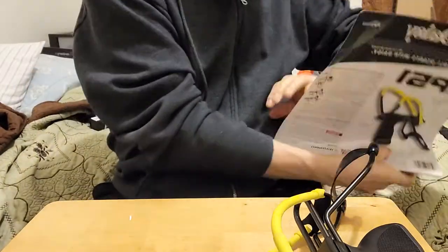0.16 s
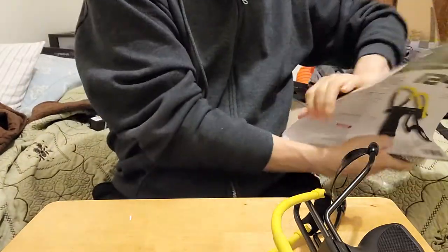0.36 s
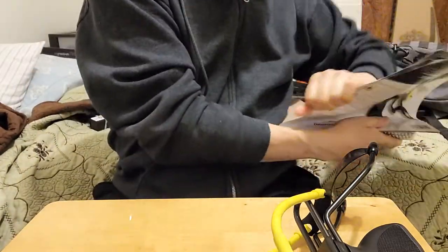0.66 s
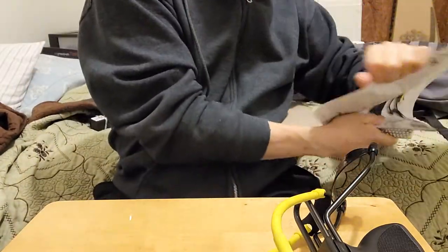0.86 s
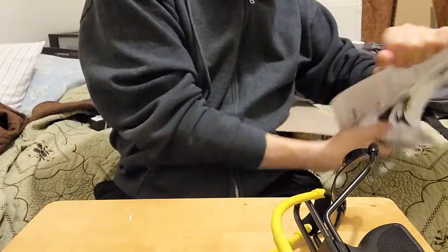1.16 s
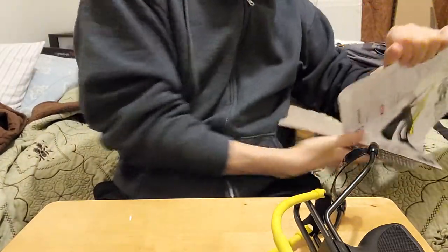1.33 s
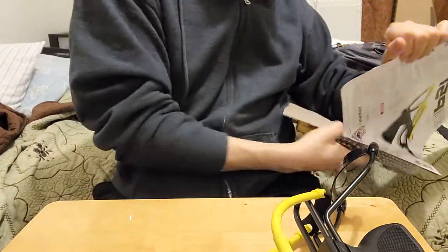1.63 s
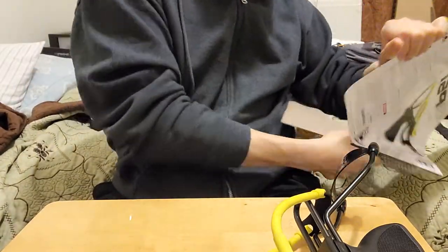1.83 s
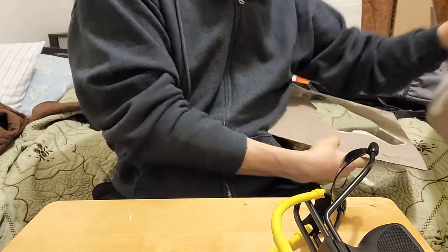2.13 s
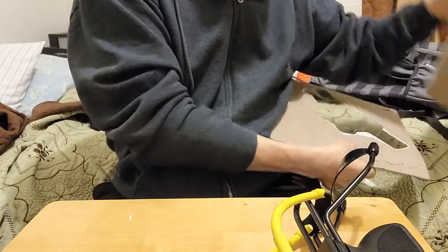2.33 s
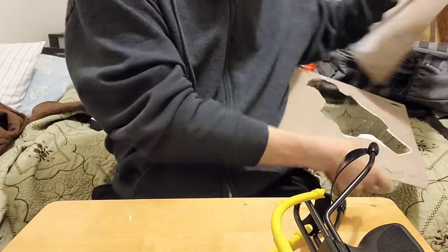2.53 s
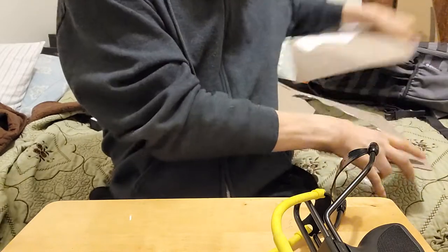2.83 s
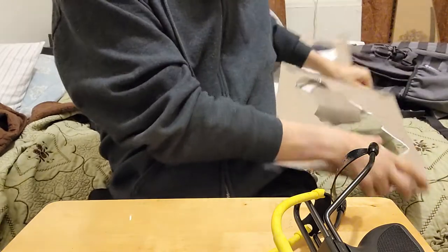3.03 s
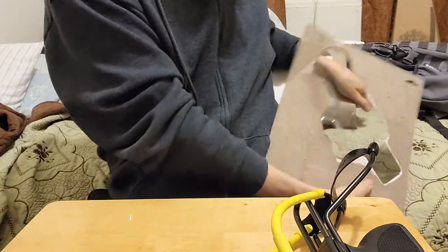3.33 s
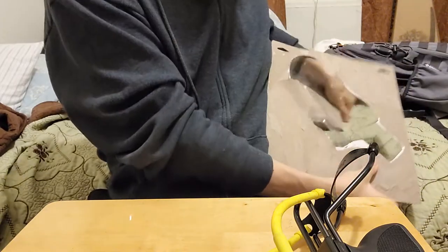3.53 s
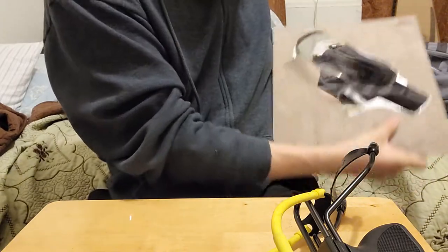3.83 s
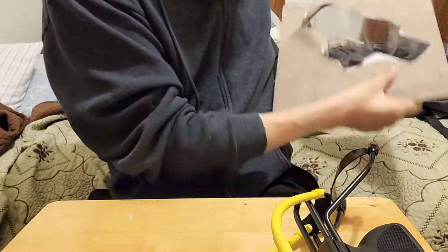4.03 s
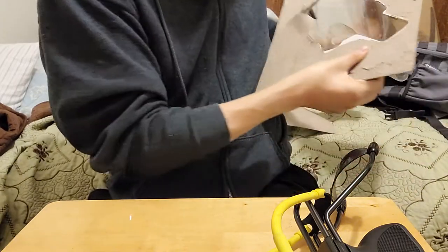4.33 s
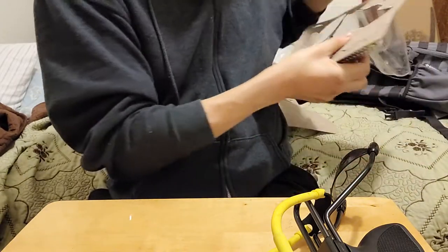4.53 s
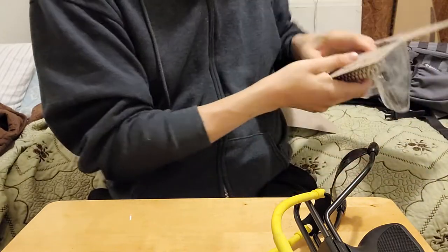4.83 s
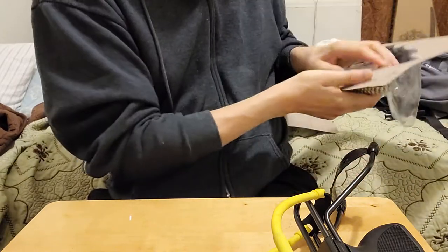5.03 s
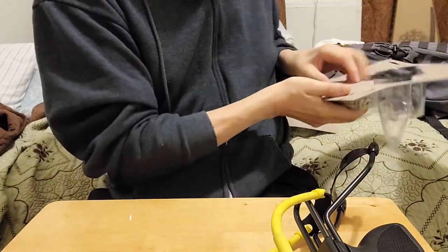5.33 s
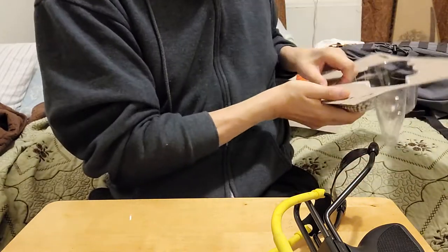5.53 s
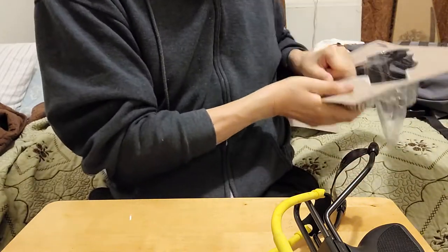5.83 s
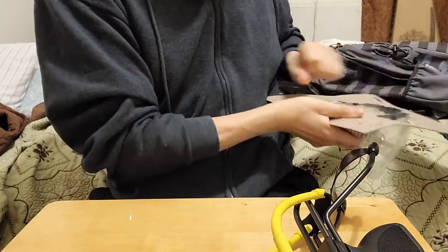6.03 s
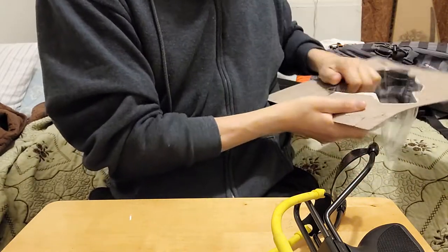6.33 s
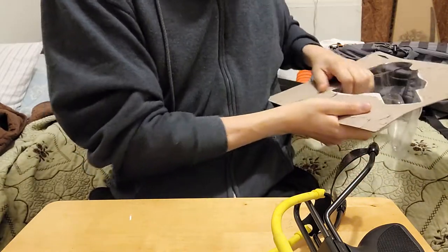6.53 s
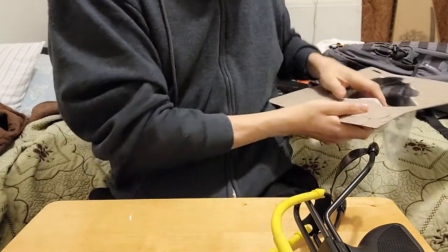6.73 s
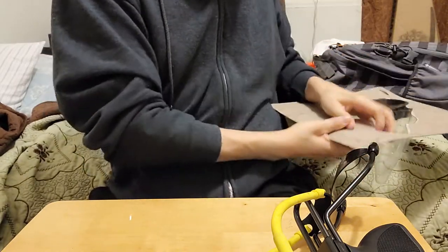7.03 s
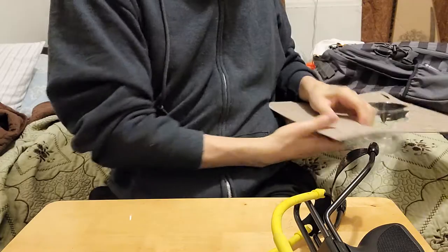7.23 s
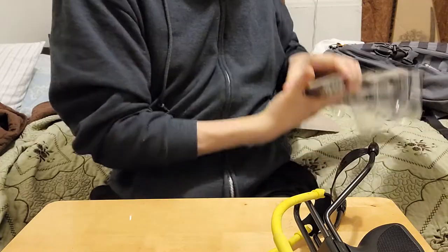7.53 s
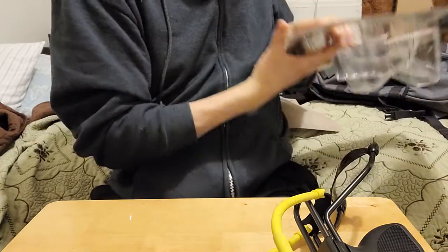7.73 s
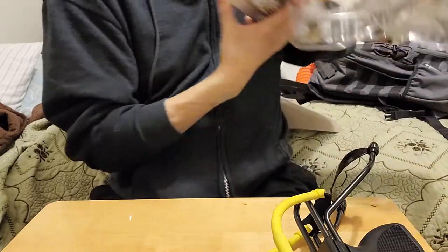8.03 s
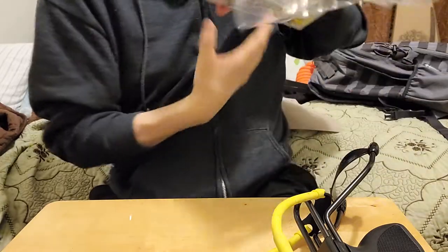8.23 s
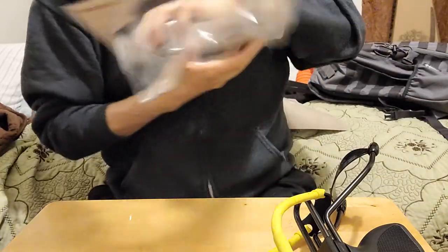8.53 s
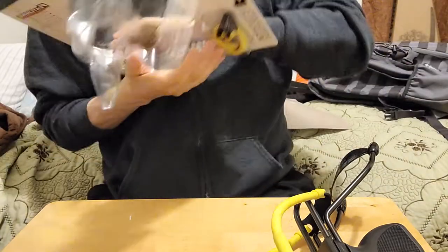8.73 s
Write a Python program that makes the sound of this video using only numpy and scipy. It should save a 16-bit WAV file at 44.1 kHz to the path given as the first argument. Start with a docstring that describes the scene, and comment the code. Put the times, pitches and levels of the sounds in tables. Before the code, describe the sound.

Close stereo sound of stiff card and clear plastic packaging handled in a small furnished room. Busy rustling and knocks with low puffs of air on the right open it, a stronger scraping peel follows, then scattered creaks and ticks. A dull double thump comes past the middle, and a loud hollow plastic pop near the end.

```python
"""A small soft-furnished room: hands peel, bend and turn a card-and-plastic blister pack.
Sliding faces hiss (dense micro-slips), creases crinkle and tick (clicks in resonances), card creaks and
panels knock (struck modes), a finger squeaks (narrow-band noise); late on, a plastic shell pops loudly.
Waved air puffs (low noise, pushes on the right port). Two spaced ports, room reflections, faint floor noise."""
import sys
import numpy as np
from scipy import signal
from scipy.fft import rfft, irfft
from scipy.io import wavfile
from scipy.ndimage import uniform_filter1d, map_coordinates

SR = 44100
rng = np.random.default_rng(int(sys.argv[2]) if len(sys.argv) > 2 else 0)


def inscribe(sig):
    """Save sig as 16-bit PCM at rate SR to the path in sys.argv[1].

    A 1-D sig is mono; a 2-D sig holds one channel per row.
    Samples are clipped to [-1, 1] before scaling.
    """
    pcm = np.round(np.clip(np.atleast_2d(sig).T, -1, 1) * 32767)
    wavfile.write(sys.argv[1], SR, pcm.astype(np.int16))


N = 391608

# Hand moves, each a swelling and fading rustle; levels before the trims in scene():
# peak t/s, swell t/s, fade t/s, hiss level/dB, sheen level/dB re hiss, flexing level/dB, crinkle level/dB
HAND_MOVES = [(0.051, 0.18, 0.19, -48, 1, -30.5, -43), (0.17, 0.31, 0.16, -59, 7, -60, -50.5),
              (0.31, 0.032, 0.051, -77, -4.5, -41.5, -72), (0.468, 0.028, 0.033, -52, 6, -45, -51),
              (0.5, 0.4, 0.31, -54, 2.5, -46.5, -52.5), (0.614, 0.027, 0.061, -74, -3, -65, -50),
              (0.67, 0.06, 0.023, -49, 0, -64, -68), (0.786, 0.15, 0.099, -38, 4, -36.5, -43.5),
              (0.95, 0.34, 0.081, -73, 14, -50.5, -60.5), (1.091, 0.34, 0.076, -49, 4, -53, -58),
              (1.241, 0.13, 0.06, -65, 2.5, -54.5, -63), (1.39, 0.1, 0.1, -69.5, 5, -48.5, -64.5),
              (1.435, 0.026, 0.023, -46.5, -13, -71, -44.5), (1.727, 0.088, 0.11, -56.5, 1, -51.5, -53.5),
              (1.891, 0.041, 0.22, -41.5, 7, -63, -55), (1.945, 0.09, 0.16, -36.5, 0, -39, -47.5),
              (2.0, 0.14, 0.12, -35.5, 5.5, -32.5, -43.5), (2.07, 0.1, 0.042, -43, 1, -35.5, -45),
              (2.318, 0.11, 0.21, -56.5, -0.5, -54.5, -63.5), (2.416, 0.0087, 0.19, -63, 0, -51.5, -71),
              (2.527, 0.0073, 0.11, -70, -5, -46, -74), (2.57, 0.1, 0.47, -62.5, 2, -51.5, -62),
              (2.7, 0.032, 0.043, -56, -7, -53, -61.5), (2.8, 0.18, 0.25, -65.5, -16, -54, -60.5),
              (2.91, 0.0087, 0.38, -54.5, -1, -54, -65), (3.0, 0.039, 0.11, -64, 11, -37, -62),
              (3.035, 0.066, 0.13, -52, -4, -57, -45.5), (3.139, 0.063, 0.062, -54.5, 2, -31.5, -46),
              (3.26, 0.29, 0.092, -56, -3, -42.5, -53.5), (3.341, 0.078, 0.088, -57.5, -2, -37.5, -51),
              (3.46, 0.075, 0.086, -76, -9, -45, -63), (3.63, 0.044, 0.061, -74, -7, -54, -52),
              (3.65, 0.91, 0.092, -61, 0, -50, -60), (3.785, 0.05, 0.041, -64, -6, -46.5, -59),
              (3.89, 0.42, 0.084, -70, -6, -55.5, -65.5), (3.913, 0.013, 0.063, -56, -18, -44, -56),
              (4.004, 0.16, 0.072, -65, 1, -47.5, -61.5), (4.152, 0.23, 0.094, -63, -8, -55.5, -59.5),
              (4.3, 0.34, 0.038, -72, -17, -52.5, -66.5), (4.32, 0.0061, 0.088, -49.5, -8, -31, -52),
              (4.369, 0.088, 0.077, -58, 2, -35, -54.5), (4.68, 0.14, 0.24, -61, -8, -54, -63),
              (4.76, 0.12, 0.066, -75.5, -6, -45.5, -54.5), (4.925, 0.017, 0.061, -48.5, -1, -50, -50),
              (4.986, 0.54, 0.091, -56.5, 2, -50.5, -59), (5.022, 0.036, 0.22, -63.5, 3, -60, -64),
              (5.11, 0.23, 0.033, -58.5, 0, -57, -72), (5.27, 0.25, 0.22, -64, 0, -56, -69),
              (5.374, 0.21, 0.11, -58.5, 3, -53.5, -57.5), (5.429, 0.1, 0.049, -64, -3, -50.5, -58.5),
              (5.552, 0.14, 0.058, -60.5, -4, -50.5, -58.5), (5.725, 0.3, .05, -62, 4.5, -60, -80),
              (5.769, 0.047, 0.059, -42, 10.5, -44, -65), (5.858, 0.014, 0.088, -28.5, 0.5, -27, -38),
              (5.943, 0.097, 0.089, -46, 0, -30, -40), (6.237, 0.032, 0.13, -51, -6, -44.5, -47.5),
              (6.296, 0.16, 0.11, -54.5, 3.5, -43, -63), (6.394, 0.041, 0.38, -59, 3.5, -51.5, -62),
              (6.56, 0.024, 0.059, -61.5, 0, -65, -78), (6.72, 0.24, 0.041, -65, 1, -58, -84),
              (6.745, 0.016, 0.13, -51, 1, -34.5, -50), (6.808, 0.14, 0.15, -53, 1, -63, -53.5),
              (6.946, 0.035, .08, -59, -4, -44, -51), (7.018, 0.092, 0.092, -50, -2, -35.5, -50),
              (7.22, 1, 0.031, -70, -2, -54, -66.5), (7.245, 0.0081, 0.085, -52.5, 1, -40.5, -48.5),
              (7.29, 0.06, 0.36, -58.5, 2, -56.5, -63), (7.578, 0.11, 0.064, -106.5, -6, -54, -79),
              (7.651, 0.12, 0.13, -61.5, -4, -48, -57), (7.826, 0.0067, 0.11, -97, -51, -48, -95),
              (8.02, 0.18, 0.081, -69, -18, -53.5, -67), (8.047, 0.021, 0.04, -59.5, -12, -39.5, -57.5),
              (8.23, 0.0069, 0.041, -70, -18, -42.5, -58.5), (8.313, 0.0087, 0.23, -84, -7, -43, -60.5),
              (8.416, 0.066, 0.4, -44.5, 3, -37, -75), (8.522, 0.19, 0.089, -42, -6, -38, -45),
              (8.61, 0.15, 0.66, -61, -3, -48, -55), (8.8, 0.099, 0.92, -67, -1, -62, -53)]
# Sliding hiss spectrum: f/Hz, relative density level/dB
SLIDE_SPECTRUM = [(880, -10), (1500, -2.5), (2130, -2), (2750, -3.5), (4940, -0.5), (7240, 0),
                  (9000, -10.5), (11700, -17), (19800, -120)]
# Treble sheen of sliding: f/Hz, relative density level/dB
SHEEN_SPECTRUM = [(7500, -29), (9200, -15), (10500, -7.5), (11500, -3), (13000, -3), (16000, -4)]
# Crinkle spectrum: f/Hz, relative density level/dB
CRINKLE_SPECTRUM = [(560, -18), (950, -2.5), (1500, -3.5), (1900, -3.5), (2300, -8), (3400, -9),
                    (6000, -19), (8000, -83)]
# Flexing card resonances: f/Hz, width f/Hz, level/dB
CARD_MODES = [(194, 234, -1.5), (259.5, 74, 0), (360, 44, -1.5), (399, 20, -4.5), (473.8, 43, -2.5),
              (547.3, 39, -2), (764, 215, 0)]
# Panel knocks: t/s, body peak level/dB, panel pitch f/Hz, snap level/dB re body peak, t60/s at panel pitch
PANEL_KNOCKS = [(0.045, -26.5, 410, 3, 0.061), (0.112, -29.5, 486, 8, 0.018),
                (0.298, -38, 493, -13.5, 0.009), (0.461, -37, 905, -11, 0.026),
                (0.607, -27.5, 323, -22, 0.043), (0.619, -38.5, 320, -35, .015),
                (1.428, -36.5, 880, -30, 0.04), (1.434, -31.5, 1085, -5, 0.018),
                (1.712, -47, 513, -21, 0.11), (2.073, -36.5, 276, -19, 0.039),
                (2.413, -40.5, 358, -12, 0.03), (2.527, -49.5, 290, 1, 0.078),
                (2.546, -45, 708, -13, 0.017), (2.692, -46, 760, -10, 0.018), (2.902, -38, 817, -6, 0.052),
                (2.91, -36.5, 324, -8, 0.017), (2.993, -31, 387, -21, 0.0047), (3.017, -50, 760, -9, .02),
                (3.04, -31, 810, -12, 0.0078), (3.13, -30, 527, -11, 0.026), (3.144, -32, 494, -19, 0.027),
                (3.222, -43, 756, -15, 0.033), (3.237, -28, 303, -20, 0.014),
                (3.285, -32.5, 314, -7, 0.036), (3.315, -26, 490, -11, 0.016), (3.347, -42, 584, -4, 0.023),
                (3.381, -39, 480, -20, 0.015), (3.452, -40.5, 266, -11, 0.12),
                (3.623, -38.5, 404, 2, 0.011), (3.778, -44, 322, -3, 0.052), (3.914, -38, 497, 4, 0.0081),
                (4.017, -37, 208, -32, 0.015), (4.318, -41.5, 257, 14, 0.056),
                (4.349, -28.5, 438, 0, 0.021), (4.665, -49.5, 1910, 1, .01), (4.75, -39, 340, 2, 0.013),
                (4.861, -43.5, 785, 0.5, .02), (5.011, -38, 850, -24, 0.028),
                (5.018, -37.5, 371, -21, 0.14), (5.022, -41.5, 745, -20, 0.052),
                (5.03, -55, 363, -16, 0.046), (5.357, -52, 745, 8, 0.019), (5.752, -48, 1890, -15, .02),
                (5.78, -41, 443, -21, 0.045), (5.857, -17, 282.5, -0.5, 0.08),
                (5.885, -23.5, 357.2, -22, 0.35), (5.919, -17.5, 354, -25, 0.014),
                (5.93, -25, 723, -15, 0.076), (6.222, -43.5, 378, -6, 0.055), (6.291, -40, 358, -8, 0.071),
                (6.393, -38.5, 440, -0.5, 0.12), (6.556, -46, 375, -1.5, 0.033),
                (6.744, -31.5, 853, 5.5, 0.1), (6.788, -38, 520, 5, 0.0082), (6.942, -43, 706, 5, 0.19),
                (7.0, -26.5, 340.5, -21, 0.1), (7.244, -30.5, 500, 0.5, 0.011),
                (7.569, -45.5, 370, -3.5, 0.13), (7.618, -53, 740, 6, 0.018), (7.828, -47, 500, -31, 0.031),
                (7.835, -36.5, 415, -34, 0.058), (8.044, -40, 534, -22, 0.013), (8.051, -46, 321, -19, 0.1),
                (8.225, -38.5, 536, -7, 0.011), (8.311, -37.5, 470, -30, 0.02),
                (8.343, -50, 390, -4, 0.025), (8.396, -38, 447, -12, .03), (8.488, -34, 368, -17, 0.03),
                (8.593, -37, 390, 0, 0.025)]
# Panel modes: multiple of panel pitch, level/dB before random spread
PANEL_MODES = [(.62, -10), (.8, -1), (1.0, 9), (1.2, 2), (1.5, 1), (1.9, -6), (2.5, -7), (3.2, -10)]
# Shell pop and rebounds: t/s, body peak level/dB, crack level/dB re body peak
SHELL_JOLTS = [(8.670, -3.5, -9), (8.678, -8.5, -14), (8.684, -3.5, -26), (8.70, -18.5, -15),
               (8.732, -16.5, -30)]
# Hollow shell modes: f/Hz, level/dB before random spread, t60/s
SHELL_MODES = [(330, -10, 0.048), (459, -1, 0.019), (743, -7, 0.04), (882, -6, 0.073), (925, -6.5, 0.083),
               (975, -5, 0.072), (1170, 4.5, 0.02), (1450, 9, 0.008), (1940, 4, 0.0097),
               (2350, 4.5, 0.0046)]
# Film ticks: t/s, peak level/dB, nominal f/Hz within a wide resonance
FILM_TICKS = [(0.4653, -37, 5120), (2.7044, -42, 4130), (3.3493, -34, 5000), (4.0861, -41, 4500),
              (4.154, -33.5, 3480), (4.2607, -41, 3500), (4.35, -38, 9000), (4.9217, -33, 3570),
              (6.2905, -31.5, 7320), (6.544, -39, 6960), (6.7426, -47, 3050), (7.0115, -29, 6560),
              (7.244, -42, 3200), (8.0147, -55, 3350), (8.1277, -43, 6160)]
# Finger squeaks: peak t/s, swell t/s, fade t/s, level/dB, upper resonance level/dB re its mode level
FINGER_SQUEAKS = [(5.768, 0.0096, 0.011, -61.5, -7), (8.043, 0.081, .02, -77.5, 13)]
# Squeak resonances, lower then upper: f/Hz, level/dB, t60/s
SQUEAK_RESONANCES = [(2110, 16, 0.0084), (3240, 0.5, 0.015)]
# Air wafts from the waved sheet: peak t/s, swell t/s, fade t/s, left level/dB, right level/dB
AIR_WAFTS = [(.11, 0.04, 0.095, -66, -27.5), (.24, 0.18, 0.096, -45, -38), (.36, 0.17, 0.24, -63, -44.5),
             (.5, 0.11, 0.087, -74, -52), (.85, 0.63, 0.38, -60, -57), (3.28, 0.41, 0.092, -59, -52),
             (4.1, .5, 0.75, -81, -80), (5.9, 0.2, 0.33, -64, -64), (7.1, 0.48, 0.52, -70, -67),
             (8.8, 0.56, 0.62, -67, -66)]
# Right-port gusts, before the high-pass: t/s, peak level/dB, push length t/ms
AIR_GUSTS = [(.088, -14.5, 2.8), (.128, -9, 4.6), (.136, -28, 4), (.195, -12.5, 8.7), (.308, -23.5, 7.8),
             (.365, -16, 5.4)]
# Pack position: t/s, left-port lag t/ms re right
PACK_LAG = [(0, 0.13), (7.4, 0.12), (8.0, -0.011), (8.88, -0.081)]
# Low room resonances, alike at both ports: f/Hz, level/dB
ROOM_RESONANCES = [(282, -50.5), (342, -50), (471, -58), (543, -62.5), (747, -60.5)]
# Diffuse sound: f/Hz, left-right likeness (1 alike, 0 unrelated, -1 opposed)
PORT_LIKENESS = [(60, 0.95), (130, 1), (200, 0.76), (300, 0.93), (550, 0.56), (1650, -0.031), (4970, 0.075),
                 (15000, -0.56)]
# Floor noise spectrum: f/Hz, relative density level/dB
FLOOR_SPECTRUM = [(26, -7), (40, 18), (85, 4.5), (120, 13), (463, -19), (1830, -1), (2500, -12.5),
                  (7250, -13), (8740, -20), (15000, -15), (16000, -37)]

SWELL_SLOPE_DB, TOP_ROUNDNESS = 26, 0.079   # fall per swell or fade time; top rounding in those times
CONTACT_DECAY_MS, RISE_CYCLES = 2.65, 0.084   # rise in cycles: a high stiff panel is struck more abruptly
SQUEAK_SLIPS_PER_S, SQUEAK_SAG_PER_S = 65, 2.5   # sag: share of pitch lost per s past the peak
STILL_AIR_DB, FLOOR_DB = -84, -68.5
ROOM_T60_S, ROOM_DB, ROOM_GAP_MS = 0.26, 2.5, 0.28
SPOT_S = .03   # contact moves to a spot with other reflections
KNOCK_WET_DB, POP_WET_DB = -5, -5   # blows close to the ports send less to the room
EXPAND_BELOW_DB, EXPAND_DB_PER_DB = -71, .5
TOP_STOP_HZ = 16120


def sliding(level_db, sheen_db):
    """Dense micro-slips between two faces, heard as hiss with a treble sheen."""
    slips = grains(per_s=9000., spread_db=4.5)
    hiss = colour(slips, SLIDE_SPECTRUM)
    sheen = from_db(sheen_db) * colour(slips, SHEEN_SPECTRUM)
    return from_db(level_db) * (hiss + sheen)


def crinkling(level_db):
    """Creases give way in bunches of small snaps."""
    bunches = clumps(per_s=42.0, depth_db=4.0)
    snaps = colour(grains(per_s=900., spread_db=4.0), CRINKLE_SPECTRUM)
    return from_db(level_db) * bunches * snaps


def flexing(level_db):
    """Fibres slip in irregular soft jerks that drive the card's resonances."""
    slips = from_db(level_db) * rms_one(grains(per_s=360.0, spread_db=0.0))
    click = np.eye(1, 8192)[0]
    body = 0
    for k, (hz, width_hz, db) in enumerate(CARD_MODES):
        body = body + (-1) ** k * from_db(db) * np.sqrt(width_hz) * ring(click, hz, 2.7 / width_hz)
    # soft fibres excite no treble, small slips no bass
    body = signal.sosfilt(butter2([170, 1300], "band"), body)
    return signal.oaconvolve(slips, body / np.sqrt(np.sum(body ** 2)))[:N]


def knocks():
    """A rough contact of a few ms drives the panel modes and gives off a snap."""
    out, t = np.zeros(N), np.arange(SR // 5) / SR
    rough = rng.standard_normal((len(PANEL_KNOCKS), len(t)))
    spread_db = rng.normal(0, 2.5, (len(PANEL_KNOCKS), len(PANEL_MODES)))
    for (s, peak_db, hz, snap_db, t60), noise, extra_db in zip(PANEL_KNOCKS, rough, spread_db):
        contact = (1 - np.exp(-t * hz / RISE_CYCLES)) * np.exp(-t * 1000 / CONTACT_DECAY_MS)
        scrape = contact * noise
        push = np.diff(contact, prepend=0) + 0.0023 * scrape   # panel follows changes of force
        modes = [from_db(db + e) * ring(push, hz * k, t60 / k)
                 for (k, db), e in zip(PANEL_MODES, extra_db)]
        body = sum(modes[1::2]) - sum(modes[::2])   # neighbours start in opposite phase
        snap = from_db(snap_db) * band(scrape, 570, 2400)
        add(out, s, from_db(peak_db) * (body / np.abs(body).max() + snap))
    return out


def pop():
    """Each jolt of the shell is a short rounded push into all its modes, with a noise crack."""
    out, t = np.zeros(N), np.arange(SR // 4) / SR
    spread_db = rng.normal(0, 2.5, (len(SHELL_JOLTS), len(SHELL_MODES)))
    rough = rng.standard_normal((len(SHELL_JOLTS), len(t)))
    # the thin shell moves little air
    push = signal.sosfilt(butter2(260, "high"), t * np.exp(-t / .00007))
    for (s, peak_db, crack_db), extra_db, noise in zip(SHELL_JOLTS, spread_db, rough):
        body = 0
        for k, ((hz, db, t60), e) in enumerate(zip(SHELL_MODES, extra_db)):
            body = body + (-1) ** k * from_db(db + e) * ring(push, hz, t60)
        crack = from_db(crack_db) * band(noise * t * np.exp(-t / 0.0008), 2200, 6500)
        add(out, s, from_db(peak_db) * (body / np.abs(body).max() + crack))
    return out


def ticks():
    """A crease in the film flips: one click in a wide resonance."""
    out, click = np.zeros(N), np.eye(1, 400)[0]
    for s, peak_db, hz in FILM_TICKS:
        add(out, s, from_db(peak_db) * band(click, hz / 1.53, hz * 1.16))
    return out


def squeaks():
    """Stick-slip: two narrow unsteady tones sag in pitch; the lower throbs, the upper is briefer."""
    t, out = np.arange(N) / SR, 0
    slips_per_s = SQUEAK_SLIPS_PER_S * clumps(per_s=24.0, depth_db=1.5)
    throb = np.cos(np.pi * np.cumsum(slips_per_s) / SR) ** 2
    for s, swell, fade, db, upper_db in FINGER_SQUEAKS:
        shape = np.exp(-((t - s) / np.where(t < s, swell, fade)) ** 2)
        warped_s = t - SQUEAK_SAG_PER_S * np.clip(t - s, 0, 1) ** 2 / 2
        gains = [shape * throb, shape ** 4 * from_db(upper_db)]
        for (hz, mode_db, t60), gain in zip(SQUEAK_RESONANCES, gains):
            decay = from_db(-60 / (t60 * SR))
            a, b = signal.lfilter([1], [1, -decay], rng.standard_normal((2, N)))
            phase = 2 * np.pi * hz * warped_s
            tone = rms_one(a * np.cos(phase) + b * np.sin(phase))
            out = out + from_db(db + mode_db) * gain * tone
    return out


def draught():
    """Turbulent air on the ports: low lumpy noise, own in each, and single pushes on the right."""
    low = butter2([35, 130], "band")
    out = np.array([from_db(db) * rms_one(signal.sosfilt(low, rng.standard_normal(N)))
                    for db in swells(AIR_WAFTS, STILL_AIR_DB)])
    t, pushes = np.arange(N) / SR, 0
    for k, (s, db, ms) in enumerate(AIR_GUSTS):
        pushes = pushes - (-1) ** k * from_db(db) * np.exp(-((t - s) * 2000 / ms) ** 2)
    out[1] += signal.sosfilt(butter2(42, "high"), pushes)
    return out


def room(x, count):
    """Reflections build up after a gap and die away, cycling over count spots; low modes stay."""
    t, out = np.arange(SR // 2) / SR, 0
    spot = np.arange(N) / SR / SPOT_S
    for k in range(count):
        from_spot = (spot - k + count / 2) % count - count / 2
        share = np.cos(np.pi / 2 * np.clip(from_spot, -1, 1)) ** 2
        build_up = 1 - np.exp(-(t * 1000 / ROOM_GAP_MS) ** 2)
        tail = diffuse(size=len(t)) * from_db(-60 * t / ROOM_T60_S) * build_up
        tail = signal.lfilter([1], [1, -.45], tail)   # walls and bedding take some treble
        tail = tail / np.sqrt(np.sum(tail ** 2) / 2)
        out = out + signal.oaconvolve((share * x)[None], tail, axes=1)[:, :N]
    boom = sum((-1) ** k * from_db(db) * ring(x, hz, ROOM_T60_S)
               for k, (hz, db) in enumerate(ROOM_RESONANCES))
    return from_db(ROOM_DB) * out + boom


def floor_noise():
    """Steady diffuse noise of fixed spectrum."""
    return from_db(FLOOR_DB) * colour(diffuse(size=N), FLOOR_SPECTRUM)


def from_db(db):
    """Decibels to gain."""
    return 10 ** (np.asarray(db) / 20)


def rms_one(x):
    """Scale to rms 1."""
    return x / np.sqrt(np.mean(x ** 2) + 1e-20)


def butter2(hz, kind):
    """Second-order Butterworth sections."""
    return signal.butter(2, hz, kind, fs=SR, output="sos")


def band(x, low_hz, high_hz):
    """Band-pass, peak 1."""
    y = signal.sosfilt(butter2([low_hz, high_hz], "band"), x)
    return y / np.abs(y).max()


def ring(x, hz, t60):
    """Two-pole resonator: a unit click rings as a decaying sine of initial height 1."""
    r, w = from_db(-60 / (t60 * SR)), 2 * np.pi * hz / SR
    return signal.lfilter([0, np.sin(w)], [1, -2 * r * np.cos(w), r * r], x)


def add(out, s, sound):
    """Mix a short sound in at s."""
    i = round(s * SR)
    out[i:i + len(sound)] += sound[:N - i]


def grains(per_s, spread_db):
    """Randomly timed clicks of random sign; spread_db makes sizes uneven."""
    sizes = from_db(spread_db * np.minimum(rng.exponential(1, N), 4)) * rng.choice([-1, 1], N)
    return sizes * (rng.random(N) < per_s / SR) + 1e-18


def clumps(per_s, depth_db):
    """Gain that comes and goes in uneven bunches; rms 1."""
    knots = rng.standard_normal(round(N / SR * 60))   # 60 per s
    knots = rms_one(signal.lfilter([1], [1, -np.exp(-2 * np.pi * per_s / 60)], knots))
    curve = np.interp(np.arange(N) * 60 / SR, np.arange(len(knots)), knots)
    return rms_one(from_db(depth_db * curve))


def in_time(rows):
    """Curve columns at every sample."""
    s, *columns = np.transpose(rows)
    return [np.interp(np.arange(N) / SR, s, c) for c in columns]


def swells(rows, rest_db):
    """Rows swell and fade; powers add over a resting level. One dB curve per level column."""
    s, swell, fade, *levels_db = np.transpose(rows)
    t = np.arange(0, N / SR + .002, .001)[:, None]
    away = np.where(t < s, (s - t) / swell, (t - s) / fade)
    rounded = np.hypot(away, TOP_ROUNDNESS) - TOP_ROUNDNESS
    shape = from_db(-2 * SWELL_SLOPE_DB * rounded)   # doubled dB: power
    power = shape @ from_db(2 * np.transpose(levels_db)) + from_db(2 * rest_db)
    return in_time(np.c_[t, 10 * np.log10(power)])


def at_hz(points, hz):
    """Read a spectrum on a log-frequency axis."""
    points_hz, values = np.array(points).T
    return np.interp(np.log(hz + 1), np.log(points_hz), values)


def colour(x, spectrum):
    """Give x a spectrum; rms 1."""
    hz = np.arange(x.shape[-1] // 2 + 1) * SR / x.shape[-1]
    return rms_one(irfft(rfft(x) * from_db(at_hz(spectrum, hz)), x.shape[-1]))


def diffuse(size):
    """Stereo white noise with left-right likeness set per frequency."""
    mid, side = rfft(rng.standard_normal((2, size)))
    alike = np.clip(at_hz(PORT_LIKENESS, np.arange(len(mid)) * SR / size), -1, 1)
    return rms_one(irfft(np.sqrt(1 + alike) * mid + np.sqrt(1 - alike) * side * [[1], [-1]], size))


def scene():
    """Direct sound reaches the two ports at different times; room, draught and floor join it."""
    moves = np.array(HAND_MOVES)
    shine_column = moves[:, 3] + moves[:, 4]   # sheen re hiss -> absolute
    rows = np.c_[moves[:, :4], shine_column, moves[:, 5:]]
    slide_db, shine_db, flex_db, crinkle_db = swells(rows, rest_db=-81.5)
    sheen_db = shine_db - slide_db
    pack = sliding(slide_db - 7.5, sheen_db) + crinkling(crinkle_db - 2.5)
    pack = pack + flexing(flex_db - 10.5) + squeaks()
    # small panels radiate little bass
    pack, knock, shell = signal.sosfilt(butter2(100, "high"), [pack, knocks(), pop()])
    near = pack + knock + shell + ticks()
    half_lag = in_time(PACK_LAG)[0] * SR / 2000   # samples
    at = np.arange(N)
    left = map_coordinates(near, [at - half_lag], order=3)
    right = map_coordinates(near, [at + half_lag], order=3)
    direct = np.array([left, right]) * from_db([[-.3], [.3]])
    # a broad sheet beams other slips at each port
    wide = [sliding(slide_db - 3.5, sheen_db) for port in direct]
    to_room = pack + from_db(KNOCK_WET_DB) * knock + from_db(POP_WET_DB) * shell
    return direct + wide + room(to_room, count=8) + draught() + floor_noise()


def record(dry):
    """High-pass against rumble; an expander turns quiet moments down further; the top is cut."""
    power = uniform_filter1d(np.mean(dry ** 2, axis=0), size=1024)
    level_db = 10 * np.log10(power + 1e-12)
    dry = signal.sosfilt(signal.butter(3, 38, "high", fs=SR, output="sos"), dry)
    gain_db = EXPAND_DB_PER_DB * np.minimum(level_db - EXPAND_BELOW_DB, 0)
    top_cut = signal.cheby2(24, 70, TOP_STOP_HZ, fs=SR, output="sos")
    return signal.sosfilt(top_cut, dry * from_db(gain_db))


dry = scene()
out = record(dry)
inscribe(out)
```